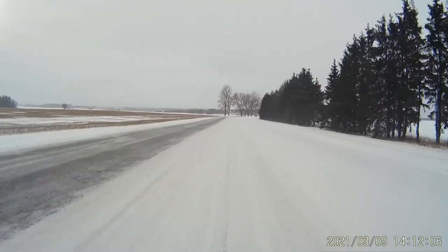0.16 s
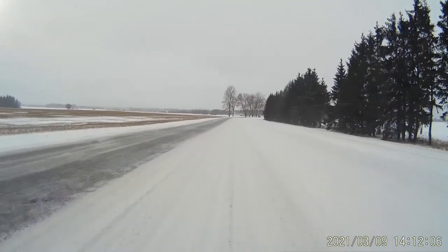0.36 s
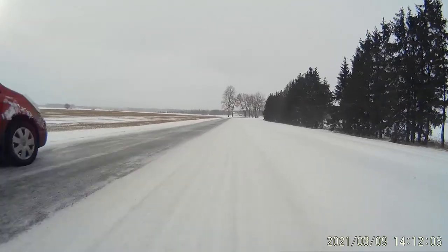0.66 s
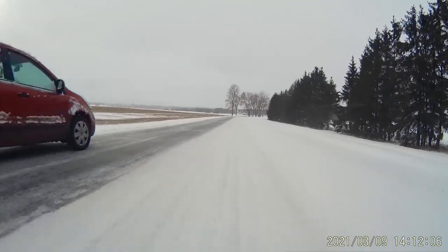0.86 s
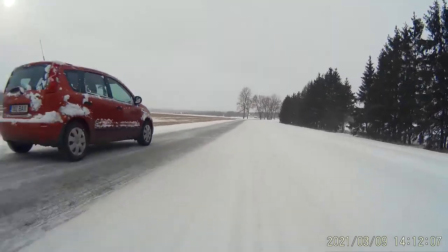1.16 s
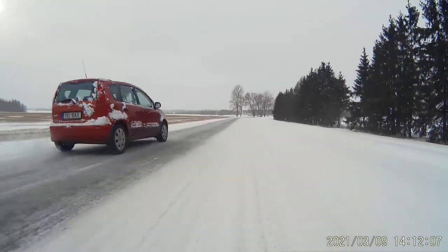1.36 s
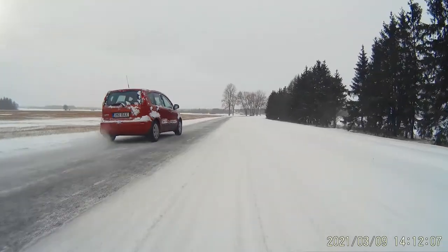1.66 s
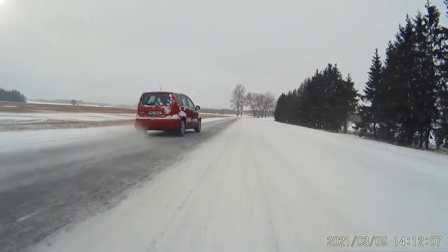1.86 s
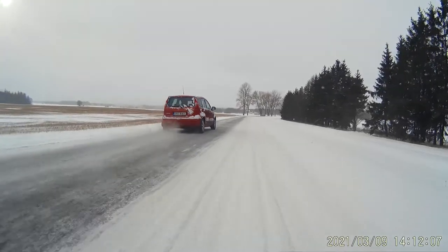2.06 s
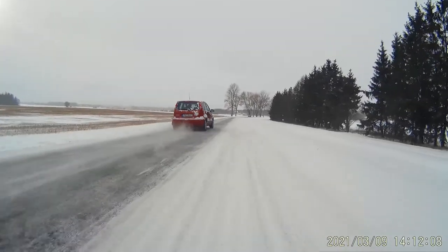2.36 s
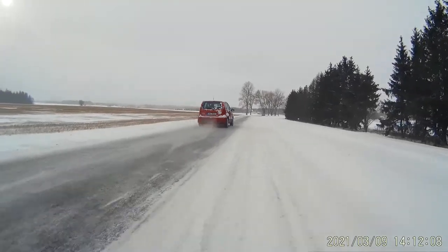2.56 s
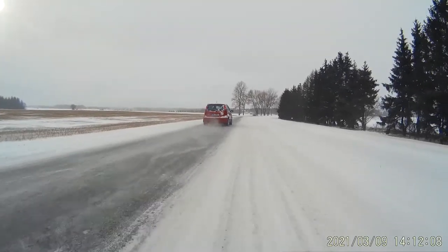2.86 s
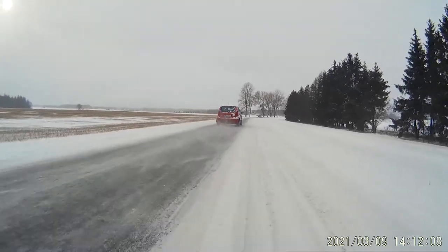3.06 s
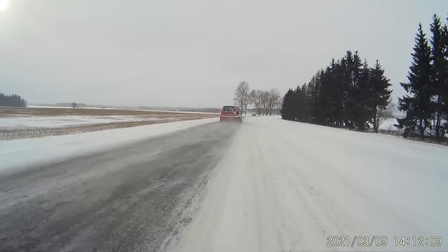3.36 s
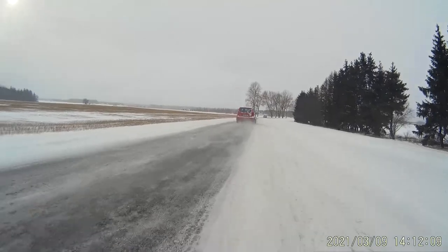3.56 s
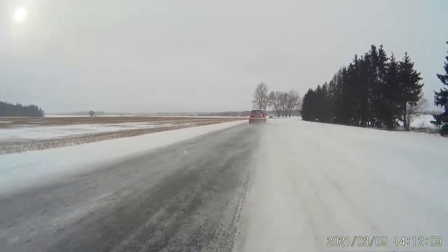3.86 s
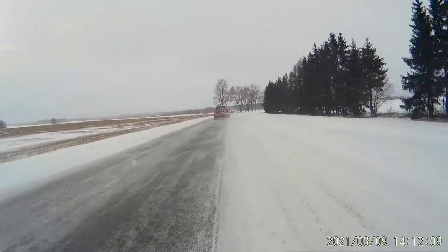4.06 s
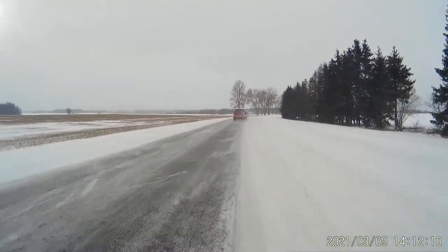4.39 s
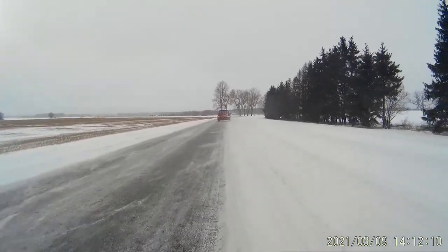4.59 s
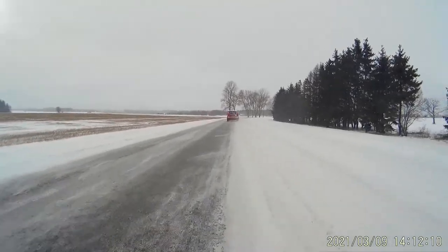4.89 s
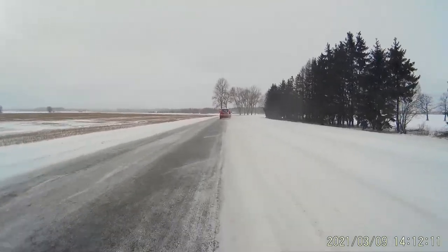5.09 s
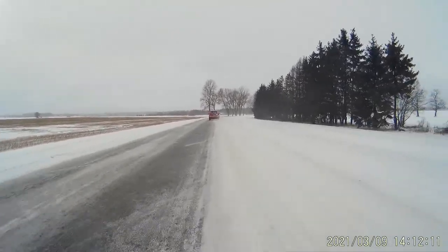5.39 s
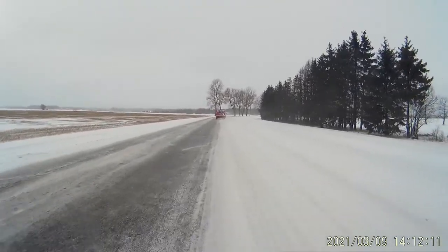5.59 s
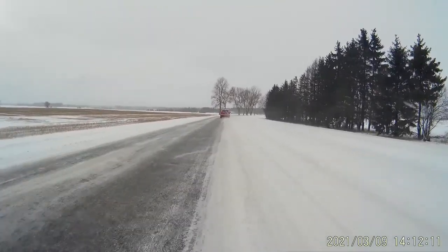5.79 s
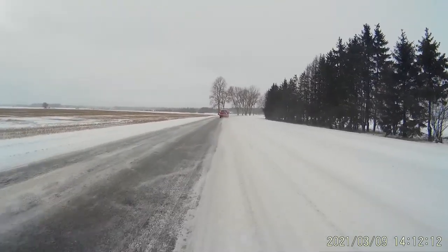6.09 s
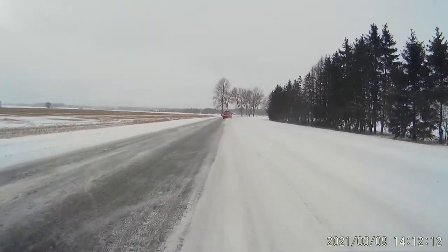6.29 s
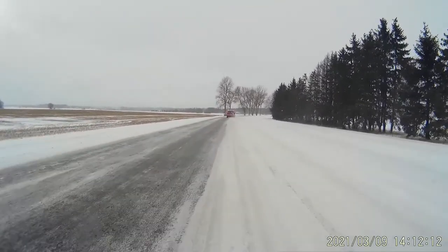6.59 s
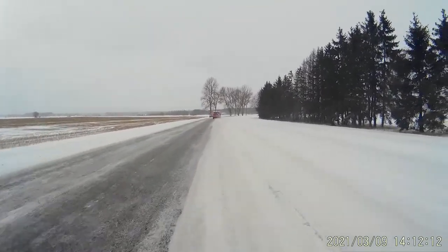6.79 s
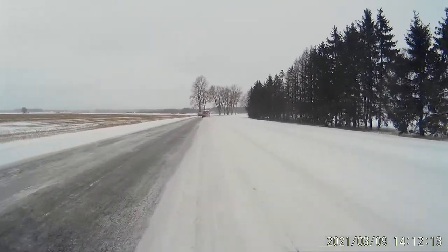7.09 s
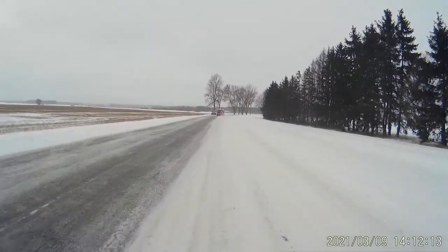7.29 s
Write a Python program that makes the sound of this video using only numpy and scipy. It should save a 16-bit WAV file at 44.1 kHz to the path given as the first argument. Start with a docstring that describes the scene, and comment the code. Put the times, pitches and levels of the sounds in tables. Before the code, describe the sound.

Close, dull knocks, clacks and sharp ticks from a bike-mounted camera over rumbling snowy ground, with a car's faint tyre hiss receding early.

```python
"""A bicycle's frame hums and trembles over packed snow, amid the knocks, clacks and ticks of a camera
clamped to its handlebar. Noise excites the resonances of fork, clamp, bar and shell; brief bursts
ring those of shell, hinge and microphone port; longer bursts scrape. At first the coloured noise of
a car's tyres washes over this and fades. Crushed snow crackles, a thin whistle sounds briefly, and
the microphone hisses throughout."""
import sys
import numpy as np
from scipy import signal
from scipy.fft import rfft, irfft, next_fast_len
from scipy.io import wavfile
from scipy.ndimage import map_coordinates

SR = 44100
rng = np.random.default_rng(int(sys.argv[2]) if len(sys.argv) > 2 else 0)


def generate_wav(sig):
    """Save sig (samples, or channels by samples) to the path in sys.argv[1] as 16-bit PCM at SR."""
    pcm = np.round(np.clip(np.atleast_2d(sig).T, -1, 1) * 32767).astype(np.int16)
    wavfile.write(sys.argv[1], SR, pcm)


N = 328104  # samples

# Excitation by the snow under the wheels. Each row: start in seconds, then levels in dB
# of the bar (its roughness), the shell's chatter, the tyre's thrum and the clamp's hum.
ROAD_LEVELS = [(0.0, -49, -58, -59, -51), (0.41, -51.5, -56.5, -59, -52.5), (0.85, -52.5, -59, -60, -53.5),
               (1.28, -49, -57.5, -57, -48), (1.82, -51.5, -61, -57, -53.5),
               (2.4, -50.5, -60.5, -55.5, -51), (2.69, -55.5, -60.5, -61, -55),
               (2.92, -53.5, -63, -62.5, -50), (3.21, -53, -65, -62, -50.5), (4.06, -51.5, -61, -61, -53),
               (4.39, -49.5, -57.5, -51, -49), (4.66, -50.5, -60.5, -58, -51.5),
               (5.06, -49, -58.5, -50, -52), (5.18, -48, -63, -55.5, -54.5), (6.18, -53.5, -64, -56, -50.5),
               (6.59, -56, -66, -62, -63), (7.15, -52, -65.5, -58, -56), (7.44, -56, -68.5, -55, -53.5)]

# Resonances of the fork, clamp, handlebar and camera shell.
# Each row: centre in Hz, bandwidth in Hz, relative gain in dB.
FORK_MODES = [(48.7, 18, 0)]
CLAMP_MODES = [(174, 18, 0)]
BAR_MODES = [(255.4, 30.8, 2.5), (355.3, 23.3, -4.5), (428.7, 71, -5.5), (528, 340, -19)]
SHELL_MODES = [(770, 186, 1), (1100, 154, 3), (1290, 151, 0.5), (1890, 130, -17.5)]

# Spectrum of the bicycle tyre's thrum. Each row: frequency in Hz, relative density in dB per Hz.
TYRE_SPECTRUM = [(15, -10), (26, -5.5), (34, 3), (60, -21), (80, -11.5), (100, 4), (128, 11.5), (150, 6),
                 (205, -3.5), (240, -30), (400, -90)]

# Swells of the fork's hum and of the clamp's hum. Each row: centre in seconds, level in dB.
FORK_SWELLS = [(.25, -58), (.47, -54), (.78, -60), (1.08, -43), (1.36, -45.5), (2.1, -55), (2.29, -42),
               (3.05, -51), (3.38, -55), (3.56, -42.5), (3.95, -50), (4.19, -47.5), (4.31, -45),
               (4.41, -42.5), (4.77, -48.5), (5.13, -44), (5.65, -47.5), (5.99, -48), (6.29, -45),
               (7.17, -41)]
CLAMP_SWELLS = [(.43, -47), (.53, -46), (.63, -42.5), (.92, -42), (.99, -47), (1.14, -44.5), (1.25, -42),
                (1.43, -45.5), (1.79, -43), (2.17, -42.5), (2.29, -45), (2.85, -49.5), (3.6, -44),
                (4.0, -40), (4.08, -45), (4.27, -41), (4.43, -51), (4.55, -38.5), (4.61, -38),
                (4.89, -38.5), (5.05, -45), (5.28, -51), (5.42, -41.5), (5.99, -45), (6.11, -50),
                (6.9, -42.5)]

# Dull knocks of the shell. Each row: start in seconds, peak of the upper modes in dB,
# rms of the lowest mode in dB, rms of the bar's thud in dB.
SHELL_KNOCKS = [(0.2534, -50, -45, -45), (0.4589, -49, -52, -50), (0.5628, -49, -58, -44),
                (0.8919, -60, -63, -72), (1.0762, -44, -44, -43), (1.1373, -42, -58, -51),
                (1.5524, -47, -58, -50), (1.7724, -45.5, -51, -60), (2.0807, -48.5, -57, -62),
                (2.3998, -43, -52, -58), (2.6454, -46, -58, -50), (2.8549, -51, -63, -58),
                (3.02, -48.5, -55, -45), (3.2027, -61, -52, -38.5), (3.2224, -56, -50, -44),
                (3.378, -48, -56, -63), (3.463, -45, -48, -56), (3.5313, -39, -48, -58),
                (3.5679, -47, -47, -38), (3.5759, -54, -36, -29.5), (3.5888, -44, -43, -49),
                (3.6096, -38.5, -42.5, -41), (3.901, -44, -51, -58), (4.1754, -51, -50, -60),
                (4.2098, -43.5, -45, -50), (4.2403, -48, -52, -52), (4.2834, -46, -56, -55),
                (4.3173, -43.5, -57, -50), (4.3474, -48, -48, -40), (4.3833, -41, -40, -53),
                (4.5021, -50, -46.5, -36), (4.7276, -40.5, -43, -54), (4.7639, -33.5, -39, -55),
                (4.8482, -39, -39.5, -41), (4.989, -49, -58, -44), (5.1037, -41, -47, -52),
                (5.1842, -43, -48, -45), (5.216, -41, -49, -57), (5.475, -40.5, -53, -42),
                (5.5119, -49, -60, -49), (5.5333, -47, -54, -38.5), (5.7152, -41, -42.5, -49),
                (6.0456, -47.5, -59, -54), (6.0671, -48, -52.5, -52), (6.0807, -42.5, -42.5, -50),
                (6.1742, -46, -65, -62), (6.2627, -48, -52, -46), (6.6298, -53, -66, -51),
                (7.1462, -46, -58, -63), (7.3585, -50, -55, -66)]

# Harder clacks of the mount's hinge. Each row: start in seconds, clack peak in dB, crack rms in dB.
HINGE_CLACKS = [(0.4868, -47, -60), (0.5555, -48, -60), (0.603, -48, -57), (0.6878, -52, -67),
                (0.8997, -50, -67), (1.074, -47, -66), (1.1353, -47, -59), (1.2687, -45, -63),
                (1.2864, -46, -63), (1.342, -45, -65), (1.5426, -41.5, -60), (1.618, -47, -69),
                (1.6447, -55, -58), (1.7284, -52, -56), (2.2717, -47, -67), (2.3311, -50, -71),
                (2.605, -54, -72), (2.6447, -48, -62), (3.3774, -49, -66), (3.5328, -50, -69),
                (3.6476, -48, -66), (3.9315, -47, -69), (4.013, -50.5, -59), (4.1022, -49, -74),
                (4.1105, -50, -70), (4.2198, -51, -69), (4.291, -48, -68), (4.3001, -51, -58),
                (4.349, -52, -76), (4.4233, -45, -69), (4.4844, -52, -64), (4.783, -53, -68),
                (4.9227, -56, -60), (4.9917, -43, -65), (5.0634, -50.5, -66), (5.0903, -51, -62),
                (5.1183, -39, -56), (5.1403, -47, -61), (5.4311, -55, -61), (5.4755, -56, -62),
                (5.5174, -54, -71), (5.6381, -65, -66), (5.658, -46, -70), (5.9254, -55, -72),
                (5.985, -51.5, -65), (6.0287, -49, -69), (6.1115, -49, -67), (6.1403, -45, -63),
                (6.1707, -46.5, -56), (6.2482, -60, -73), (6.356, -60, -73), (6.6266, -52, -71),
                (7.1092, -53, -61), (7.1387, -56, -69), (7.1736, -51.5, -63)]

# Resonances of the hinge: its clack, then its higher crack.
# Each row: centre in Hz, bandwidth in Hz, relative gain in dB.
HINGE_MODES = [(1708, 224, 2.5), (2560, 1430, -2.5), (3040, 730, -1)]
HINGE_CRACK_MODES = [(4480, 2300, 0)]

# Sharp ticks near the microphone port. Each row: start in seconds, cavity peak in dB, treble rms in dB.
PORT_TICKS = [(0.4873, -53, -71), (0.9004, -56, -67), (1.049, -52, -65), (1.0848, -47.5, -58),
              (1.1697, -59, -74), (1.1932, -62, -73), (1.2181, -54, -71), (1.2722, -39, -56),
              (1.2868, -53, -68), (1.3418, -50, -70), (1.3584, -57, -74), (1.4958, -46, -57),
              (1.5174, -60, -65), (1.5399, -44, -56), (1.5527, -42, -56), (1.586, -49, -66),
              (1.6297, -56, -74), (1.701, -55, -71), (1.717, -49.5, -65), (2.152, -52, -73),
              (2.168, -58, -73), (2.2169, -54, -68), (2.2563, -54, -70), (2.2734, -42, -53),
              (2.541, -49, -63), (2.6474, -45, -67), (2.7323, -62.5, -60), (2.8541, -42.5, -54),
              (3.049, -49, -68), (3.1093, -49, -67), (3.2377, -49, -64), (3.3793, -44, -54),
              (3.4016, -47, -65), (3.4695, -54, -64), (3.4885, -55, -72), (3.6462, -45, -59),
              (3.6604, -55, -60), (3.845, -54, -72), (3.933, -47.5, -56), (4.0143, -51, -71),
              (4.0447, -58, -77), (4.0996, -55, -66), (4.117, -51.5, -71), (4.4747, -51.5, -74),
              (4.8015, -58, -58), (4.8275, -40.5, -52), (4.8422, -39, -45.5), (4.86, -46, -58),
              (4.9086, -45, -56), (4.9234, -49, -66), (4.9916, -55, -71), (5.0449, -54, -73),
              (5.1193, -58, -70), (5.2906, -65, -59), (5.4306, -44.5, -57), (5.4409, -48, -64),
              (5.4894, -52.5, -70), (5.5458, -53, -66), (5.66, -48, -64), (5.687, -48, -60),
              (5.7039, -54, -65), (5.724, -50, -63), (5.748, -44, -54), (5.9199, -51, -68),
              (5.9976, -49.5, -70), (6.031, -44.5, -58), (6.094, -43.5, -56), (6.1393, -55, -71),
              (6.1717, -51, -68), (6.6233, -49, -67), (6.7334, -55, -68), (6.8817, -50, -73),
              (7.0903, -57, -71)]

# Resonances of the port's cavity, then of the ticks' treble.
# Each row: centre in Hz, bandwidth in Hz, relative gain in dB.
PORT_MODES = [(4570, 890, -16.5), (6520, 380, -1), (7160, 1730, -10)]
TICK_TREBLE_MODES = [(9600, 900, -3), (10700, 1200, 0), (12400, 1500, -5), (14200, 1500, -5)]

# Slips of the mount. Each row: start in seconds, length in seconds,
# low-band level in dB, high-band level in dB, both at the middle of the stroke.
MOUNT_SCRAPES = [(1.265, 0.024, -62, -60), (1.341, 0.019, -72, -71), (2.254, 0.043, -59, -66),
                 (2.322, 0.026, -58, -62), (3.528, 0.022, -49, -66), (3.56, 0.086, -50, -73),
                 (3.899, 0.033, -46, -59.5), (4.09, 0.018, -75, -75), (4.21, 0.018, -50.5, -82),
                 (4.402, 0.017, -62, -69), (4.5, 0.036, -57.5, -67), (5.097, 0.056, -55.5, -75),
                 (5.507, 0.045, -54.5, -67), (5.732, 0.0095, -55, -79), (5.744, .012, -54, -70),
                 (5.917, 0.013, -65, -74), (5.987, 0.022, -52, -64), (6.105, 0.013, -53, -66),
                 (7.124, 0.046, -67, -69)]

# Spectrum of the scrapes' treble. Each row: frequency in Hz, relative density in dB per Hz.
GRIT_SPECTRUM = [(1200, -38), (2000, -1), (4000, -8.5), (7000, -11), (10000, -22), (15000, -21)]

# Course of the car's sound. Each row: time in seconds, tyre roar in dB, tread whine in dB.
CAR_LEVELS = [(0, -62, -89), (.4, -64.5, -73), (.8, -65.5, -75), (1.2, -64.5, -72), (1.7, -70, -73),
              (2.3, -66.5, -75), (3, -90, -89), (4, -92, -90), (7.44, -80, -88)]

# Spectrum of the car's tyre roar. Each row: frequency in Hz, relative density in dB per Hz.
ROAR_SPECTRUM = [(200, -9), (500, 9.5), (1000, -2), (1500, 6), (2200, 5.5), (3500, -8.5), (5000, -22.5),
                 (7000, -10.5), (9000, -15.5), (12000, -27), (15000, -78)]

# Bands of the tread whine. Each row: centre in Hz, bandwidth in Hz, relative gain in dB.
WHINE_BANDS = [(3230, 320, 0), (4690, 250, -8)]

# Level of the snow crushed under the bicycle's tyres. Each row: time in seconds, level in dB.
CRUNCH_LEVELS = [(0, -63.5), (1, -65.5), (2, -76), (2.6, -71.5), (3, -75), (3.6, -68.5), (4, -81),
                 (4.5, -70), (5, -81), (5.5, -77.5), (6, -78), (6.6, -73), (7.1, -74), (7.44, -77)]

# Spectra of crushed snow and of microphone hiss.
# Each row: frequency in Hz, relative density in dB per Hz.
SNOW_SPECTRUM = [(700, -10.5), (1500, 0.5), (2500, -2.5), (5000, -9), (9000, -14.5), (15000, -39)]
HISS_SPECTRUM = [(500, -2), (2000, 1), (6500, 4), (10000, 1.5), (13000, 3), (16400, 0.5)]

# A thin short whistle. The single row: start in seconds, end in seconds, mean pitch in Hz, mean level in dB.
WHISTLE_TONE = (1.635, 1.775, 14700, -78)

# Attenuation at the top of the spectrum. Each row: frequency in Hz, gain in dB.
TOP_ROLL_OFF = [(14700, 0), (15750, -7), (15850, -19), (16450, -28)]
TOP_HZ = 16450  # nothing passes at or above this


def fork_hum():
    """Forced resonance: the fork's noise-driven hum rises and falls, and is a little louder on rough snow."""
    road_db = curves(ROAD_LEVELS)[0]
    mean_db = road_db.mean()
    follow = 0.13  # dB of hum per dB of roughness
    steady_db = mean_db - 1.5 + follow * (road_db - mean_db) + 2.5 * wobble(22)
    level = np.hypot(amp(steady_db), swells(FORK_SWELLS, half_s=0.04))
    return level * hum(FORK_MODES, steadiness=0.56)


def clamp_hum():
    """Forced resonance: the clamp hums unsteadily, and swells add to its power."""
    hum_db = curves(ROAD_LEVELS)[3]
    level = np.hypot(amp(hum_db + 1.8 * wobble(30)), swells(CLAMP_SWELLS, half_s=0.025))
    return level * hum(CLAMP_MODES, steadiness=0.62)


def tyre_thrum():
    """Broadband excitation: the rolling tyre gives low noise of a fixed spectrum and changing level."""
    thrum_db = curves(ROAD_LEVELS)[2]
    return amp(thrum_db) * coloured(rng.standard_normal(N), TYRE_SPECTRUM)


def bar_and_shell():
    """Common modulation: bar and shell share one random unevenness, and the shell chatters in quicker lumps."""
    bar_db, shell_db = curves(ROAD_LEVELS)[:2]
    unevenness = wobble(35)
    bar_swing = amp(0.41 * unevenness + 1.54 * wobble(12))
    shell_chatter = amp(1.65 * unevenness + 1.56 * wobble(110))
    bar = amp(bar_db) * unit(bar_swing * resonant(BAR_MODES))
    shell = amp(shell_db) * unit(shell_chatter * resonant(SHELL_MODES))
    return bar + shell


def knocks():
    """Modal excitation by impact: each knock rings shell and bar modes in its own balance."""
    when, db, tint_db = scattered(SHELL_KNOCKS, count=40, weakest_db=-58, spread_db=7.5)
    small = np.transpose([when, db, db - 3 + tint_db, db + 5 - tint_db])
    s, upper_db, lowest_db, thud_db = np.vstack([SHELL_KNOCKS, small]).T
    upper = contacts(s, upper_db, SHELL_MODES[1:3], rise=0.001, fall=0.0021, blunt_hz=1200)
    lowest = contacts(s, lowest_db, SHELL_MODES[:1], rise=0.00057, fall=0.0052, blunt_hz=1260,
                      rms_s=0.0017)
    thud = contacts(s, thud_db, BAR_MODES[2:3], rise=0.0035, fall=0.0079, blunt_hz=644, rms_s=0.0014)
    return upper + lowest + thud


def clacks():
    """Contact hardness: the hinge's harder impacts excite higher modes, with a brighter crack on top."""
    when, db, tint_db = scattered(HINGE_CLACKS, count=80, weakest_db=-62, spread_db=8)
    small = np.transpose([when, db, db - 15 + tint_db])
    s, clack_db, crack_db = np.vstack([HINGE_CLACKS, small]).T
    clack = contacts(s, clack_db, HINGE_MODES, rise=0.0011, fall=0.0016, blunt_hz=2780)
    crack = contacts(s, crack_db, HINGE_CRACK_MODES, rise=0.0004, fall=0.0016, blunt_hz=8000,
                     rms_s=0.00086)
    return clack + crack


def ticks():
    """Cavity resonance: tiny, hard and very short contacts ring the port and a treble above it."""
    when, db, tint_db = scattered(PORT_TICKS, count=160, weakest_db=-65, spread_db=6)
    small = np.transpose([when, db, db - 9 + tint_db])
    s, cavity_db, treble_db = np.vstack([PORT_TICKS, small]).T
    cavity = contacts(s, cavity_db, PORT_MODES, rise=0.00029, fall=0.00037, blunt_hz=30000)
    treble = contacts(s, treble_db, TICK_TREBLE_MODES, rise=0.00017, fall=0.00048, blunt_hz=30200,
                      rms_s=0.0013)
    return cavity + treble


def scrapes():
    """Friction noise: the rough catches of a slip shake bar and shell and add a gritty treble."""
    low, high = np.zeros(N), np.zeros(N)
    for s, length, low_db, high_db in MOUNT_SCRAPES:
        stroke = np.sin(np.linspace(0, np.pi, round(length * SR))) ** 0.5
        add(low, s, amp(low_db) * stroke)
        add(high, s, amp(high_db) * stroke)
    catches = unit(amp(4 * wobble(160)))
    shaken = low * resonant(BAR_MODES[2:] + SHELL_MODES)
    grit = high * coloured(rng.standard_normal(N), GRIT_SPECTRUM)
    return catches * (shaken + grit)


def car():
    """Tyre-road noise: a broadband roar and narrow bands of tread whine each follow a level curve."""
    roar_db, whine_db = curves(CAR_LEVELS)
    roar_level = amp(roar_db + 0.6 * wobble(6) + 0.7 * wobble(30))
    roar = roar_level * coloured(rng.standard_normal(N), ROAR_SPECTRUM)
    whine = amp(whine_db + 2.5 * wobble(25)) * resonant(WHINE_BANDS)
    return roar + whine


def crunch():
    """Brittle fracture: crystals break in clumps, as random spikes of uneven size over a fine rush."""
    level_db, = curves(CRUNCH_LEVELS)
    breaks = rng.random(N) < 900 / SR * amp(6 * wobble(30))  # about 900 a second at a typical density
    size_db = np.minimum(4 * rng.exponential(size=N), 12)
    spikes = breaks * amp(size_db) * rng.standard_normal(N)
    rush = 0.7 * rng.standard_normal(N)
    return amp(level_db) * coloured(unit(spikes) + rush, SNOW_SPECTRUM)


def whistle():
    """Frequency modulation: a faint sine wanders in pitch and level for a moment."""
    start, end, hz, db = WHISTLE_TONE
    t = np.arange(N) / SR
    gate = np.clip(np.minimum(t - start, end - t) / 0.01, 0, 1)  # 10 ms fades
    phase = 2 * np.pi * np.cumsum(hz + 60 * wobble(80)) / SR
    return gate * amp(db + 2.5 * wobble(60)) * np.sin(phase)


def hiss():
    """Stationary self-noise: the microphone gives a steady coloured noise."""
    return amp(-70.5) * coloured(rng.standard_normal(N), HISS_SPECTRUM)  # rms before the roll-off


def body(peaks):
    """Modal superposition: the causal response of damped resonances summed with alternating sign."""
    def response(f):
        total = 0
        for k, (centre, width, db) in enumerate(peaks):
            damping = 1j * f * width
            total = total + (-1) ** k * amp(db) * damping / (centre * centre - f * f + damping)
        return total
    return response


def resonant(peaks):
    """Forced vibration: white noise through a set of resonances, at rms 1."""
    return unit(filtered(rng.standard_normal(N), body(peaks)))


def hum(peaks, steadiness):
    """Narrow-band noise: a twice-filtered resonance keeps its wandering phase but loses most of its swell."""
    once = filtered(rng.standard_normal(N), body(peaks))
    x = filtered(once, body(peaks))
    swell = np.abs(signal.hilbert(x, next_fast_len(N))[:N])
    return unit(x / (swell / swell.mean() + 0.1) ** steadiness)


def contacts(times, levels_db, peaks, rise, fall, blunt_hz, rms_s=None):
    """Impulse excitation: brief rough bursts, dull above blunt_hz, ring the resonances.
    rise and fall are in seconds; the level is the ring's peak, or its whole energy as rms over rms_s."""
    out, m = np.zeros(N), 4096
    t, hz = np.arange(m) / SR, np.fft.rfftfreq(m, 1 / SR)
    envelope = (1 - np.exp(-t / rise)) * np.exp(-t / fall)
    bursts = rng.standard_normal((len(times), m)) * envelope
    softness = 1 / (1 + 1j * hz / blunt_hz) ** 3
    rings = irfft(rfft(bursts) * softness * body(peaks)(hz), m)
    if rms_s:
        sizes = np.sqrt(np.sum(rings ** 2, axis=1) / (rms_s * SR))
    else:
        sizes = np.abs(rings).max(axis=1)
    for s, db, wave, size in zip(times, levels_db, rings, sizes):
        add(out, s, amp(db) * wave / size)
    return out


def scattered(near, count, weakest_db, spread_db):
    """Clustering: small contacts gather around strong ones, with random times, levels and colour offsets."""
    pick, offset, size, tint = rng.random((count, 4)).T
    centre = np.array(near)[(pick * len(near)).astype(int), 0]
    when = centre + 0.12 * np.tan(2.6 * (offset - 0.5))  # seconds; dense near the centre, with long tails
    return when % (N / SR), weakest_db + spread_db * size, 8 * (tint - 0.5)


def swells(rows, half_s):
    """Addition of power: bell-shaped rises of level, one for each (seconds, dB) row."""
    t = np.arange(0, N + 64, 64) / SR  # a coarse grid suffices for slow curves
    s, db = np.transpose(rows)[:, :, None]
    power = np.sum(amp(db) ** 2 * np.exp(-((t - s) / half_s) ** 2), axis=0)
    return np.interp(np.arange(N) / SR, t, np.sqrt(power))


def coloured(x, spectrum):
    """Spectral shaping: x given a (Hz, dB) colour, at rms 1."""
    hz, db = np.transpose(spectrum)
    return unit(filtered(x, lambda f: amp(np.interp(np.log(f + 1), np.log(hz), db))))


def filtered(x, response):
    """Linear filtering: the spectrum of x times a response of frequency, padded against wrap-around."""
    m = next_fast_len(N + SR // 2)
    return irfft(rfft(x, m) * response(np.fft.rfftfreq(m, 1 / SR)), m)[..., :N]


def wobble(rate):
    """Random modulation: a smooth curve through random knots, rate knots a second."""
    knots = rng.standard_normal(int(N * rate / SR) + 4)
    return map_coordinates(knots, [np.arange(N) * rate / SR])


def curves(rows):
    """Linear interpolation: one value per sample for each column after the time."""
    s, *cols = np.transpose(rows)
    return [np.interp(np.arange(N) / SR, s, c) for c in cols]


def add(track, s, wave):
    """Superposition: lay a wave on the track from s seconds on."""
    part = track[round(s * SR):][:len(wave)]
    part += wave[:len(part)]


def amp(db):
    """Logarithmic level: decibels to amplitude gain."""
    return 10 ** (np.asarray(db) / 20)


def unit(x):
    """Normalisation: scale to rms 1."""
    return x / np.sqrt(np.mean(x ** 2) + 1e-20)


def scene():
    """Superposition: all sources add at one microphone."""
    frame = fork_hum() + clamp_hum() + tyre_thrum() + bar_and_shell()
    mount = knocks() + clacks() + ticks() + scrapes()
    surroundings = car() + crunch() + whistle()
    return (frame + mount + surroundings)[None]


def record(dry):
    """Band limitation: hiss is added, the top end rolls off and nothing passes from TOP_HZ up."""
    edge_hz, edge_db = np.transpose(TOP_ROLL_OFF)
    return filtered(dry + hiss(), lambda hz: amp(np.interp(hz, edge_hz, edge_db)) * (hz < TOP_HZ))


dry = scene()
out = record(dry)
generate_wav(out)
```